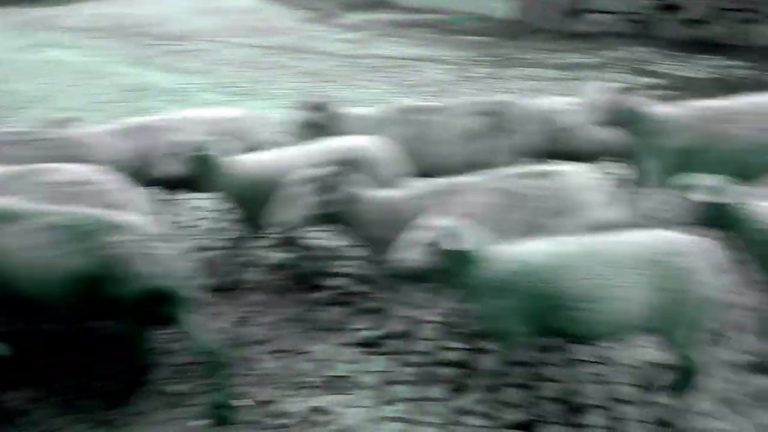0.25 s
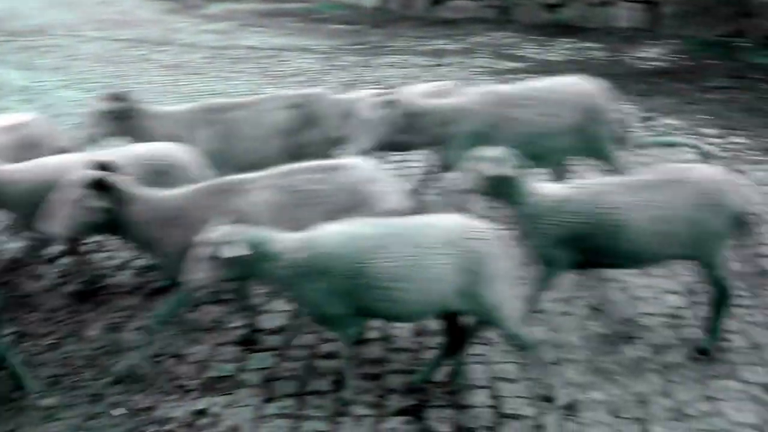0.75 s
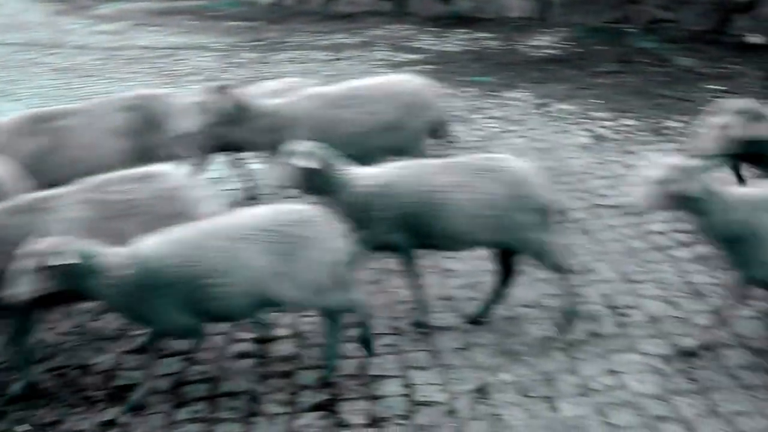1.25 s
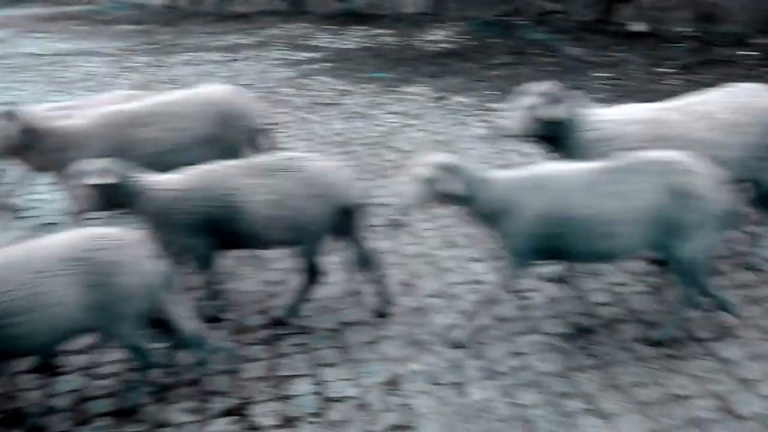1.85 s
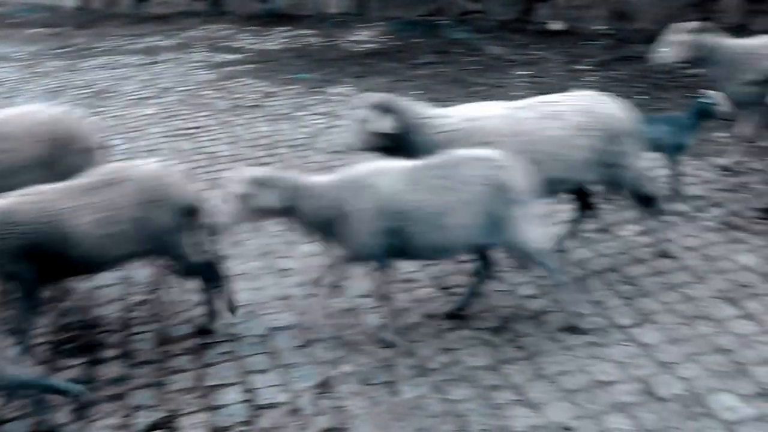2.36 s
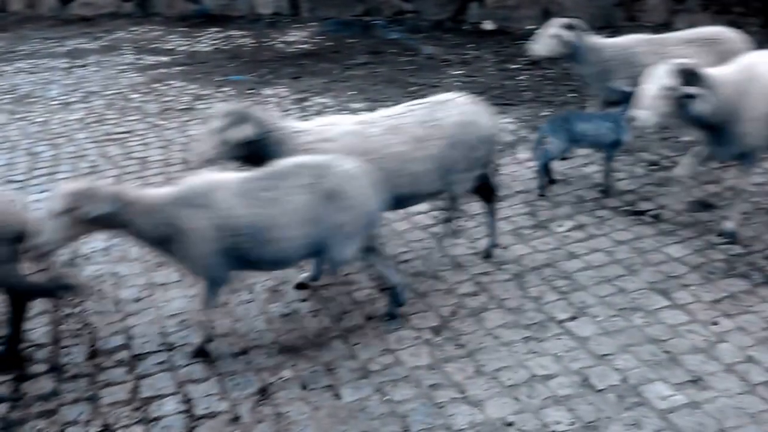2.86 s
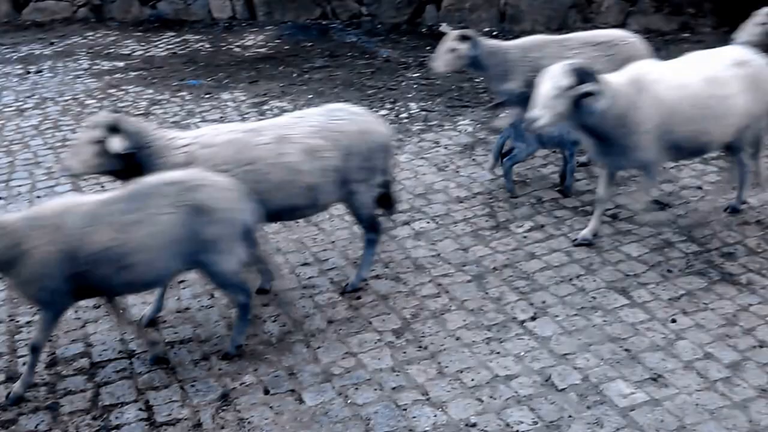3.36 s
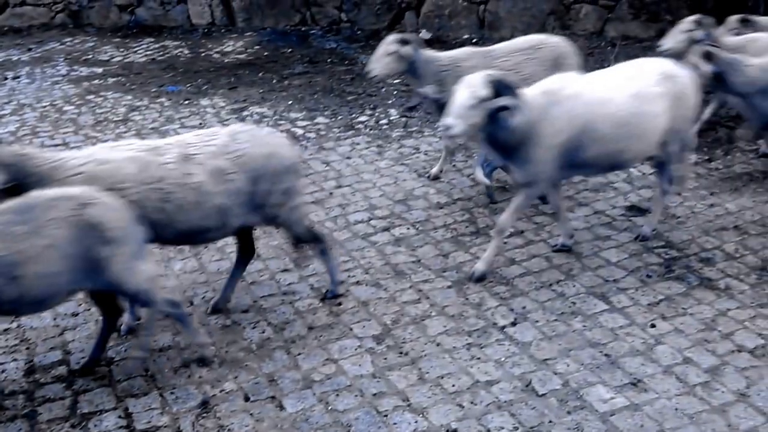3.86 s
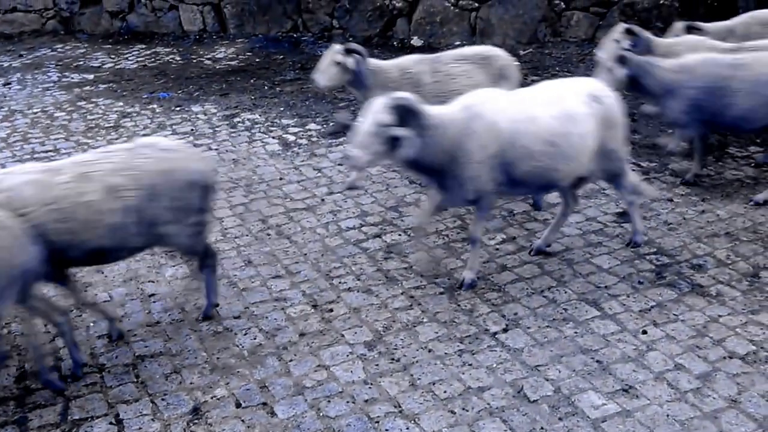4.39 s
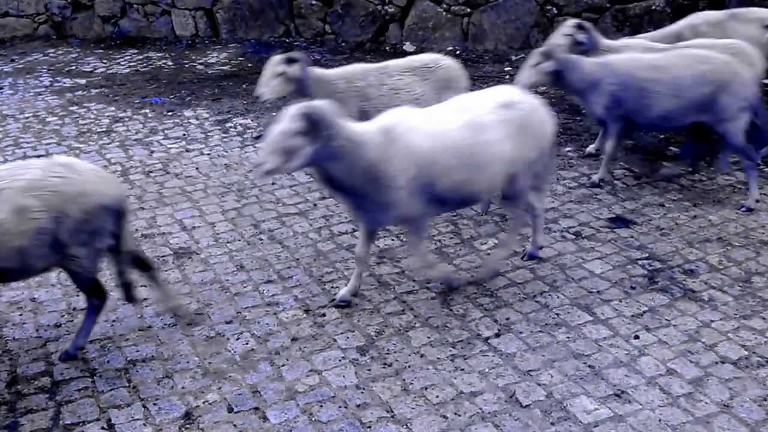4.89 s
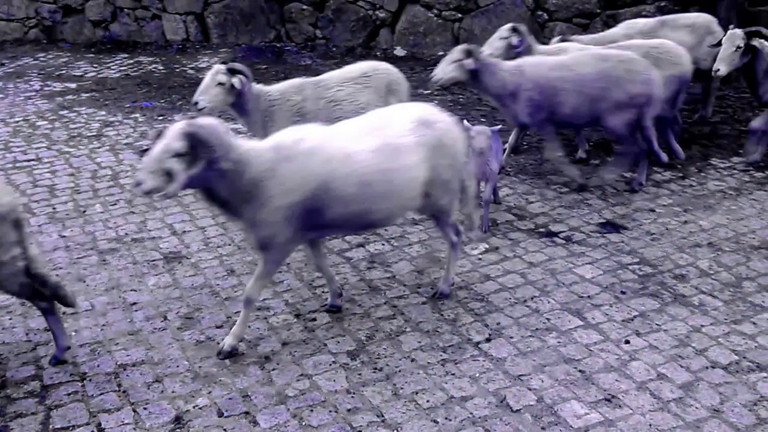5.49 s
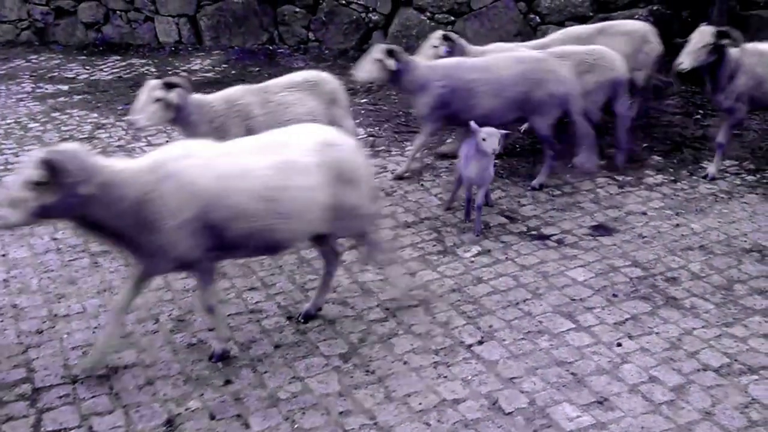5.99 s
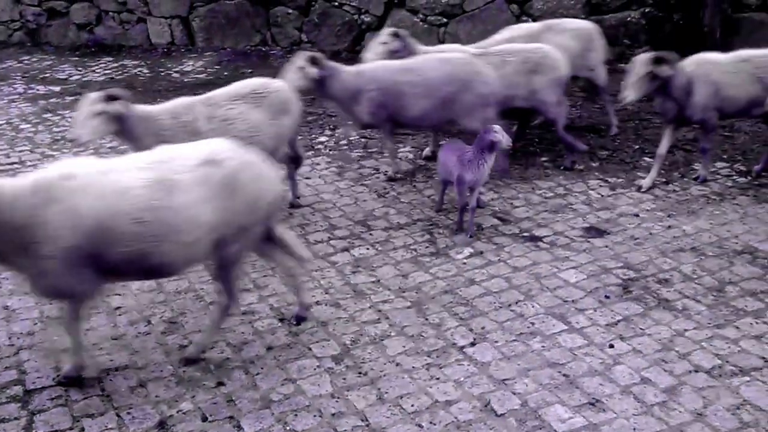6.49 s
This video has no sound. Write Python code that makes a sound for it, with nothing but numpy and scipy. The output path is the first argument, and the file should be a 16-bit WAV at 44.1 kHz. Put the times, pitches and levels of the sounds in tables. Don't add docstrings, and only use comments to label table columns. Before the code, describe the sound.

Hooves drag and click on cobbles with gritty hiss while sheep pass outdoors. First a hoarse, pulsing low grumble, then a mid-distance quavering bleat of about a second. After a stretch of only footfalls, a full-throated, nasal bleat bursts out at arm's length, held and clipped by the microphone. It stops abruptly, leaving a cluster of bright hoof clacks and light wind.

```python
import sys
import numpy as np
from scipy import signal
from scipy.io import wavfile
from scipy.ndimage import uniform_filter1d

SR = 44100
rng = np.random.default_rng(int(sys.argv[2]) if len(sys.argv) > 2 else 0)


def amplitude_ratio(level_db):
    exponent = np.asarray(level_db, float) / 20
    return 10 ** exponent


def to_wav(s):
    ch = np.atleast_2d(s).T
    pcm = np.round(np.clip(ch, -1, 1) * 32767)
    wavfile.write(sys.argv[1], SR, pcm.astype(np.int16))


N = 297234

# start_s, effort_db, pitch_hz, mouth_opening_factor
NEAR_BLEAT = [
    (4.625, -35, 148.4, 0.87),
    (4.668, -9.5, 144.2, 0.88),
    (4.714, -17, 160, 0.97),
    (4.78, -5, 169.7, 1.02),
    (4.92, -2.5, 188.1, 1.07),
    (5.201, -5, 191.2, 1.008),
    (5.638, -6.5, 187, 1.0),
    (5.834, -11.5, 177.6, 1.027),
    (5.895, -33, 137.4, 0.54),
]
# start_s, roughness_0_to_1
NEAR_ROUGH = [(4.61, .25), (4.7, .15), (4.75, .07), (4.95, .08), (5.12, .04), (5.3, .02), (5.82, .03),
              (5.91, .15)]
# start_s, factor
NEAR_JAW = [(4.61, 1.45), (4.79, 1.3), (4.84, 0.9), (5.909, 1.21)]
# centre_hz, width_hz, level_db
NEAR_THROAT = [(502.5, 235, -5), (926, 190, -8.5), (1422, 353, -4.5), (1990, 475, -2.5), (2320, 420, 3.5),
               (2720, 410, 1.5), (3120, 300, -3), (3900, 317, 10), (4570, 720, 5), (5480, 390, 3),
               (7100, 2960, -3)]
# centre_s, level_db, half_length_s
NEAR_CATCHES = [
    (4.981, -2, 0.05),
    (5.189, -1, 0.02),
    (5.301, -2, 0.059),
    (5.548, -4, 0.015),
    (5.715, 0.5, .04),
]
# share, delay_ms at start, middle, end
NEAR_ECHOES = [(0.64, 2.69, 3.92, 5.2), (0.31, 7.5, 6.1, 5.6), (0.39, 1.113, 1.922, 1.314),
               (0.6, 11.5, 13.6, 15.2), (0.2, 5.6, 4.1, 5.3)]
NEAR_QUIVER = dict(crest_s=5.04, per_s=7.8, strongest_s=5.0, spread_s=.2, pitch=0.018, effort_db=1, low_db=2)
NEAR_TONE = dict(low_db=-23, rise_s=0.21, fall_s=0.07, sag_db_per_s=-1,
                 bright_db=-10, bright_per_db=0.08, dull_db_per_s=-8)


def near_bleat():
    voice = bleat(NEAR_BLEAT, NEAR_QUIVER, NEAR_TONE, NEAR_ROUGH, NEAR_JAW, NEAR_THROAT, NEAR_CATCHES, jitter=.05)
    return bounce(voice, NEAR_BLEAT, NEAR_ECHOES)


# start_s, effort_db, pitch_hz, mouth_opening_factor
FAR_BLEAT = [
    (.82, -36, 139.5, 1.8),
    (.86, -26, 151.2, 0.96),
    (.93, -10.5, 173.9, 1.053),
    (1.06, -8, 189.2, 0.987),
    (1.25, -11.5, 189.6, 0.94),
    (1.53, -12, 186.8, 0.97),
    (1.66, -16.5, 178.8, 1.036),
    (1.859, -20, 165.4, 1.064),
    (1.931, -54, 157, 0.68),
]
# start_s, roughness_0_to_1
FAR_ROUGH = [(.82, .05), (1.1, .03), (1.2, .11), (1.55, .21), (1.95, .35)]
# start_s, factor
FAR_JAW = [(0.821, 1.08), (1.0, 1.03), (1.699, 1.03), (1.78, 1.044), (1.86, 1.11), (1.931, 0.82)]
# centre_hz, width_hz, level_db
FAR_THROAT = [(585, 163, 2), (980, 1100, -9.5), (1700, 520, -3), (2323, 650, 2.5), (2900, 680, 3.5),
              (3840, 1350, -14), (6100, 930, -13.5)]
# centre_s, level_db, half_length_s
FAR_CATCHES = [
    (1.163, -1.5, 0.056),
    (1.462, -1, 0.0067),
    (1.59, -4, 0.031),
    (1.756, -1.5, 0.012),
]
# share, delay_ms at start, middle, end
FAR_ECHOES = [(0.38, 2.225, 3.063, 3.63), (0.28, 8.5, 7.2, 6.6)]
FAR_QUIVER = dict(crest_s=1.372, per_s=7.05, strongest_s=1.453, spread_s=0.454,
                  pitch=0.0191, effort_db=1, low_db=4.5)
FAR_TONE = dict(low_db=-21, rise_s=0.25, fall_s=0.1, sag_db_per_s=-4.5,
                bright_db=-12.5, bright_per_db=0.4, dull_db_per_s=0.5)


def far_bleat():
    voice = bleat(FAR_BLEAT, FAR_QUIVER, FAR_TONE, FAR_ROUGH, FAR_JAW, FAR_THROAT, FAR_CATCHES, jitter=.08)
    return bounce(voice, FAR_BLEAT, FAR_ECHOES)


def bleat(rows, tremble, colour, roughness, jaw, throat, catches, jitter):
    span = slice(int(rows[0][0] * SR), int(rows[-1][0] * SR))
    curves = columns(rows) + columns(roughness) + columns(jaw)
    effort_db, hz, mouth, rough, drop = (uniform_filter1d(c, size=900)[span] for c in curves)
    t = np.arange(N)[span] / SR
    low_db, bright_db = tone(t, effort_db, **colour)
    lift, push_db, swell_db = quiver(t, **tremble)
    for s, db, half in catches:
        push_db = push_db + db * np.exp(-((t - s) / half) ** 2)
    wander = .004 * drift(len(t), 0.0506)
    clicks, puffs = folds(hz * (lift + wander), rough, 8300, jitter)
    drive = clicks + puffs
    jaw_open = amplitude_ratio(low_db - low_db.max())

    middle, high = 0, 0
    for k, (f, width, db) in enumerate(throat[1:]):
        gain = (-1) ** k * amplitude_ratio(db)
        if f < 3400:
            middle = middle + gain * resonate(drive, f * mouth, width) * (jaw_open if f < 1600 else 1)
        else:
            high = high + gain * resonate(drive, f * (mouth if f > 5000 else 1), width)
    middle = highpass(middle, 2, 1250)
    low_drive = clicks + .3 * puffs
    low = amplitude_ratio(low_db + swell_db) * evened(resonate(low_drive, throat[0][0] * drop, throat[0][1]))
    voice = amplitude_ratio(effort_db + push_db) * (evened(middle) + amplitude_ratio(bright_db) * evened(high)) - low
    out = np.zeros(N)
    out[span] = voice * signal.windows.tukey(len(hz), .04)
    return highpass(out, 4, 340)


def folds(hz, rough, top_hz, jitter, smear=.06):
    turns = np.cumsum(hz * (1 + jitter * rough * drift(len(hz), 0.0037))) / SR
    harmonics = range(1, int(top_hz / hz.max()))
    clicks = sum(np.cos(2 * np.pi * k * turns - smear * k ** 2) for k in harmonics)
    puffs = (0.34 + np.exp(-(turns % 1) / 0.19)) * rng.standard_normal(len(hz))
    return np.sqrt(1 - rough) * evened(clicks), rough * 2.0 * evened(puffs)


def quiver(t, crest_s, per_s, strongest_s, spread_s, pitch, effort_db, low_db):
    wave = np.cos(2 * np.pi * per_s * (t - crest_s)) * np.exp(-((t - strongest_s) / spread_s) ** 4)
    return 1 + pitch * wave, effort_db * wave, low_db * wave


def tone(t, effort_db, low_db, rise_s, fall_s, sag_db_per_s, bright_db, bright_per_db, dull_db_per_s):
    shut = np.maximum(1 - (t - t[0]) / rise_s, 0) ** 2 + np.maximum(1 - (t[-1] - t) / fall_s, 0) ** 2
    slack_db = np.clip(effort_db - effort_db.max(), -14, 0)
    middle_s = t - t.mean()
    low = low_db + sag_db_per_s * middle_s - 25 * shut
    return low, bright_db + bright_per_db * (slack_db + 1.0) + dull_db_per_s * middle_s


def bounce(x, rows, echoes):
    woolly = signal.butter(2, (1500, 4600), "band", fs=SR, output="sos")
    thin = signal.sosfiltfilt(woolly, x)
    times, at = np.linspace(rows[0][0], rows[-1][0], 3), np.arange(N)
    wet = 0
    for share, *delay_ms in echoes:
        delay = np.interp(at / SR, times, delay_ms) * SR / 1000
        wet = wet + share * np.interp(at - delay, at, thin)
    return x - thin + (thin + wet) / np.sqrt(1 + sum(row[0] ** 2 for row in echoes))


# start_s, level_db, pitch_hz
RUMBLE = [
    (0.0, -34.5, 72.1),
    (.11, -33.5, 71.05),
    (.2, -34, 70.4),
    (.39, -35, 67.7),
    (.43, -39.5, 59.7),
    (.5, -39.5, 59),
    (.55, -55, 59.6),
    (.66, -65, 61),
]
# centre_hz, width_hz, level_db
CHEST = [(69.5, 81, -3.5), (114, 30, -15), (212, 72, -4.5), (321, 62, 7)]
# centre_hz, width_hz, level_db
NOSE = [(628, 207, -2), (717, 24, 7.5), (1078, 167, -0.5)]


def rumble():
    level_db, hz = (c[:int(RUMBLE[-1][0] * SR)] for c in columns(RUMBLE))
    drive = sum(folds(hz, np.full(len(hz), .26), 1800, jitter=.2, smear=.01))
    drive = drive * amplitude_ratio(2.5 * drift(len(hz), .012))
    chest = evened(sum(amplitude_ratio(db) * resonate(drive, f, width) for f, width, db in CHEST))
    nose = evened(sum(amplitude_ratio(db) * resonate(drive, f, width) for f, width, db in NOSE))
    nose_db = -8.5 + 1.54 * (level_db - level_db.mean())
    fade = np.minimum(np.arange(len(hz))[::-1] / 2000, 1)
    return np.pad(amplitude_ratio(level_db) * (chest - amplitude_ratio(nose_db) * nose) * fade, (0, N - len(hz)))


STRIKE_S = np.arange(4500) / SR

# start_s, peak_db, centre_hz, t60_s
STRIKES = [(0.3107, -17.5, 2900, 0.45), (0.511, -21.5, 2490, 0.35), (1.046, -12, 3390, 0.084),
           (1.6586, 0.5, 2860, 0.13), (1.7866, -3, 2520, 0.13), (2.0338, -10, 3620, 0.12),
           (2.149, -6, 2640, 0.052), (2.2943, -3, 4040, 0.053), (2.4044, -20, 3700, 0.24),
           (2.529, -17, 3460, 0.34), (2.7768, -10.5, 3390, 0.39), (2.905, -14.5, 3620, 0.28),
           (3, -9.5, 3120, 0.081), (3.1234, -21, 3150, 0.33), (3.251, -15, 4250, 0.081),
           (3.506, -16.5, 4040, 0.13), (3.641, -12, 3930, 0.21), (3.8191, -8, 3840, 0.1),
           (3.9854, -5.5, 3520, 0.068), (4.066, -12, 2500, 0.17), (4.103, -8.5, 3470, 0.09),
           (4.249, -33, 4080, 0.13), (4.398, -11.5, 3750, 0.29), (5.934, 1, 2100, 0.058),
           (6.065, -9, 3560, 0.14), (6.106, -1.5, 3780, 0.065), (6.281, -7, 2720, 0.15),
           (6.4981, -6, 3500, 0.067), (6.661, -15.5, 6600, 0.2), (0.688, -3.5, 2910, 0.046)]


def scuff(peak_db, hz, t60):
    noise = rng.standard_normal(len(STRIKE_S))
    fall = amplitude_ratio(-60 * STRIKE_S / np.clip(t60, .02, .4)) * np.minimum(STRIKE_S / 0.016, 1)
    skid = evened(resonate(noise, hz, 2000)) + amplitude_ratio(-7.5) * evened(resonate(noise, 5600, 4400))
    return amplitude_ratio(peak_db - 9.5) * fall * highpass(skid, 6, 2300)


# start_s, peak_db, ring_hz
CLACKS = [(.3287, -12, 2810), (.141, -17, 2900), (.202, -18, 2900), (.6429, -13, 2890), (.84, -14, 2740),
          (1.9994, -11, 3350), (2.1744, -10, 3570), (2.2922, -9, 2970), (2.4054, -13, 3500),
          (2.6314, -9, 3100), (2.6464, -11, 3000), (2.779, -11, 3000), (2.8114, -10, 3180),
          (2.834, -9, 2950), (2.9234, -13, 2950), (3.4166, -17, 3430), (3.4451, -18, 3550),
          (3.8274, -20, 3470), (4.408, -14, 3800), (4.4204, -18, 3680), (4.5575, -19, 2790),
          (5.9379, -12, 2620), (5.9579, -11, 2730), (5.9813, -11.5, 2690), (6.0152, -11, 2750),
          (6.0272, -12, 2730), (6.1729, -6.5, 2860), (6.2267, -18, 2900), (6.2442, -18, 3030),
          (6.2786, -4, 2760), (6.3475, -16, 2820), (6.4737, -13, 2710), (6.6987, -9, 2780),
          (6.7124, -8, 2740)]


def clack(peak_db, hz):
    tick = .8 * np.sin(2 * np.pi * 5800 * STRIKE_S) * amplitude_ratio(-60 * STRIKE_S / .002)
    ring = .75 * np.sin(2 * np.pi * hz * STRIKE_S) * amplitude_ratio(-60 * STRIKE_S / .022)
    return amplitude_ratio(peak_db - 1.5) * thinned(tick + ring * np.minimum(STRIKE_S / .0006, 1))


# start_s, peak_db, centre_hz
SNAPS = [(.372, -26, 6000), (1.125, -14, 6500), (1.413, -13.5, 3197), (1.676, -9, 2950),
         (1.9678, -14, 2760), (2.1744, -13, 7000), (2.2246, -29, 3110), (2.2924, -11.5, 6900),
         (2.301, -12, 6800), (2.4057, -7.5, 7530), (2.723, -25, 7260), (2.7788, -11, 7640),
         (2.8114, -11, 4200), (3.125, -21, 6570), (3.2543, -23.5, 7570), (3.391, -32, 3770),
         (3.507, -19, 7800), (3.9846, -15, 3710), (4.2475, -22, 7020), (4.4083, -17, 3900),
         (4.5573, -14, 7700), (3.829, -17, 3550), (3.152, -15.5, 3300), (2.904, -10.5, 3380),
         (0.6436, -32, 3030), (1.999, -15, 3420), (5.9822, -15, 2600), (5.9574, -11, 6500),
         (6.1084, -15, 4170), (6.1727, -22, 6440), (6.208, -13, 6000), (6.264, -16, 6950),
         (6.279, -9, 4440), (6.375, -17, 7540), (6.4767, -13, 6600), (6.667, -17, 6850),
         (6.699, -5.5, 6920)]


def snap(peak_db, hz):
    brief = STRIKE_S[:1200]
    crack = evened(resonate(rng.standard_normal(len(brief)), hz, 940)) * amplitude_ratio(-60 * brief / 0.017)
    return amplitude_ratio(peak_db - 5.0) * thinned(crack)


# start_s, peak_db, pitch_hz
KNOCKS = [(.84, -41, 2090), (1.9669, -43, 1854), (2.7265, -34, 1790), (2.9214, -24, 1710),
          (2.9712, -26, 1900), (4.084, -19.5, 1490), (4.415, -16.5, 1920), (4.4203, -21, 1530),
          (4.427, -15, 2150), (4.432, -17, 1610), (4.5262, -23, 1680), (4.5594, -29, 1990),
          (5.937, -15, 2050), (5.9577, -14, 1880), (5.9844, -11.5, 2070), (6.0164, -16, 1890),
          (6.0252, -11.5, 1970), (6.1738, -14.5, 1830), (6.2784, -18, 1630), (6.35, -22, 1910),
          (6.4284, -25.5, 1650), (6.4766, -18.5, 1700)]


def knock(peak_db, hz):
    hollow = np.sin(2 * np.pi * hz * STRIKE_S) * amplitude_ratio(-60 * STRIKE_S / 0.018)
    return amplitude_ratio(peak_db) * thinned(hollow * np.minimum(STRIKE_S / 0.00051, 1))


# start_s, peak_db, pitch_hz
THUDS = [(0.454, -31, 109), (0.674, -49, 123), (0.771, -45, 111), (1.691, -44.5, 157), (2.492, -52, 161),
         (2.779, -51, 126), (3.026, -56, 108), (3.513, -50.5, 137), (3.978, -45, 117), (4.068, -45.5, 155),
         (4.407, -51, 129), (4.493, -48, 127), (4.625, -37, 146), (5.897, -45.5, 107.4), (6.19, -58, 118)]


def thud(peak_db, hz):
    push = np.sin(2 * np.pi * hz * STRIKE_S) * np.minimum(STRIKE_S / 0.0053, 1)
    return amplitude_ratio(peak_db - 60 * STRIKE_S / 0.29) * push


# centre_s, peak_db, centre_hz,
# half_length_s
BRUSHES = [(0.699, -48, 1300, 0.026), (0.863, -47, 380, 0.037), (2.308, -56, 378, 0.03),
           (2.729, -50, 1190, 0.005), (2.786, -55, 700, .008), (3.252, -53, 910, 0.0076),
           (3.945, -51, 675, 0.015), (4.085, -37, 980, 0.0083), (4.125, -44, 1130, 0.023),
           (5.503, -38, 406, 0.018), (5.944, -46, 500, 0.045), (6.195, -41.5, 570, 0.0055)]


def brush(peak_db, hz, half):
    swell = np.exp(-((STRIKE_S - .05) / half) ** 2)
    return amplitude_ratio(peak_db) * swell * evened(resonate(rng.standard_normal(len(STRIKE_S)), hz, 900))


def strikes():
    out = np.zeros(N + len(STRIKE_S))
    contacts = [(STRIKES, scuff, 0), (CLACKS, clack, 0), (SNAPS, snap, 0),
                (KNOCKS, knock, 0), (THUDS, thud, 0), (BRUSHES, brush, .05)]
    for rows, contact, lead_s in contacts:
        for s, *settings in rows:
            sound = contact(*settings)
            out[int((s - lead_s) * SR):][:len(sound)] += sound
    return out[:N]


# start_s, level_db
SHUFFLE = [(0, -44.5), (.45, -41), (.8, -42.5), (1.0, -37), (1.9, -36), (2.6, -41), (3.15, -41.5),
           (3.36, -51.5), (3.6, -45.5), (4.1, -39), (4.36, -48), (4.65, -38), (5.85, -34.5), (5.91, -43.5),
           (6.1, -40.5), (6.45, -45.5), (6.6, -51), (6.74, -39)]
# centre_s, peak_db, half_length_s
SWISHES = [(0.334, -22, 0.014), (0.843, -21.5, 0.0037), (1.058, -15, 0.0066), (1.132, -26, 0.021),
           (1.482, -35, 0.011), (1.67, -23, 0.0041), (1.75, -32, 0.011), (1.842, -25, 0.025),
           (2.169, -20.5, 0.0062), (2.298, -20, 0.005), (2.408, -26, 0.016), (2.726, -20, 0.0031),
           (2.782, -20.5, 0.014), (2.929, -25, 0.022), (3.023, -25.5, 0.011), (3.148, -32, 0.081),
           (3.512, -31, 0.015), (3.663, -24, 0.03), (3.835, -23.5, 0.02), (3.897, -27.5, 0.06),
           (4.07, -26, 0.0074), (4.283, -27, 0.014), (4.415, -26.5, 0.014), (4.56, -32, 0.0018),
           (5.958, -27, 0.0034), (6.228, -33, 0.0081), (6.281, -27, 0.043), (6.377, -29, 0.008),
           (6.506, -23.5, 0.0081), (6.701, -20, 0.0042)]
# frequency_hz, level_db_per_hz
SCUFF = [(88, -71), (150, -23.5), (445, -33), (1260, -18.5), (1510, -16), (1940, -9), (2400, -8.5),
         (2750, 0.5), (4120, -2), (5040, -10), (7040, -2), (8180, -6), (10600, -105), (18000, -120)]


def shuffle():
    steady = amplitude_ratio(columns(SHUFFLE)[0]) ** 2
    swept = amplitude_ratio(-6) ** 2 * swells(SWISHES, fall_db=-1.5, rise=1.17)
    level_db = 10 * np.log10(steady + swept)
    dull_db = 10 * np.log10(amplitude_ratio(6) ** 2 * steady + 0.13 * swept) - level_db
    drag = hiss(SCUFF, dull_db - 3.5, 2.66, size=256)
    grit = amplitude_ratio(6.3 * np.minimum(rng.exponential(1, N), 3)) * (rng.random(N) < 120 / SR)
    grains = highpass(drag * np.convolve(grit, np.exp(-np.arange(200) / 40))[:N], 4, 2400)
    distant = amplitude_ratio(-44.5) * hiss(SCUFF, None, 0.99, size=1024)
    return amplitude_ratio(level_db + 6) * (drag * amplitude_ratio(1.6 * drift(N, 0.0094)) + 0.21 * grains) + distant


def lane(x, t60):
    at = np.arange(120, SR // 2, 22)
    at = at + rng.integers(0, 22, len(at))
    taps = np.zeros(SR // 2 + 22)
    taps[at] = rng.choice([-1., 1.], len(at)) * amplitude_ratio(-60 * at / SR / t60)
    taps = signal.sosfilt(signal.butter(2, 4500, fs=SR, output="sos"), taps / np.linalg.norm(taps))
    return signal.fftconvolve(x, taps)[:N]


# centre_s, peak_db, half_length_s
GUSTS = [
    (.35, -44.5, 0.34),
    (1.15, -59, 0.19),
    (1.9, -49, 0.16),
    (3.15, -52.5, 0.051),
    (3.6, -54, 0.11),
    (4.15, -51, 0.054),
    (4.9, -57.5, 0.29),
    (6.26, -38, 0.055),
    (6.5, -49, 0.26),
]
# frequency_hz, level_db_per_hz
WIND = [(15, 4.5), (38, -5), (80, -6.5), (200, -18), (500, -20.5), (1200, -30)]


def wind():
    level = np.sqrt(amplitude_ratio(-55) ** 2 + swells(GUSTS, fall_db=-6, rise=1.3))
    return level * amplitude_ratio(2.0 * drift(N, 0.037)) * hiss(WIND, None, 3, size=2048)


def hiss(spectrum, tilt_db, patchy_db, size):
    hop = size // 4
    frames, hz = N // hop + 5, np.fft.rfftfreq(size, 1 / SR)
    a, b, patches = rng.standard_normal((frames, len(hz), 3)).T
    patches = evened(uniform_filter1d(uniform_filter1d(patches, size=5, axis=0), size=20, axis=1))
    f, level = np.transpose(spectrum)
    colour_db = np.interp(np.log(hz + 1), np.log(f), level)[:, None]
    z = (a + 1j * b) * amplitude_ratio(colour_db + patchy_db * patches)
    flat = signal.istft(z, nperseg=size, noverlap=size - hop)[1][:N]
    if tilt_db is None:
        return evened(flat)
    tilt = tilt_db[np.minimum(np.arange(frames) * hop, N - 1)] / (1 + (hz[:, None] / 5000) ** 6)
    return signal.istft(z * amplitude_ratio(tilt), nperseg=size, noverlap=size - hop)[1][:N] / np.std(flat)


def swells(rows, fall_db, rise):
    t = np.arange(0, N, 32) / SR
    power = 0
    for s, db, half in rows:
        away = abs((t - s) / half * np.where(t < s, rise, 1))
        power = power + amplitude_ratio(db + fall_db * away ** 1.68) ** 2
    return np.interp(np.arange(N) / SR, t, power)


def resonate(x, hz, width):
    turn = np.exp(2j * np.pi * np.cumsum(hz * np.ones(len(x))) / SR)
    r = np.exp(-np.pi * width / SR)
    return 2 * (turn * signal.lfilter([(1 - r) ** 2], [1, -2 * r, r * r], x / turn + 1e-18)).real


def drift(count, span_s):
    size = max(int(span_s * SR), 2)
    return evened(uniform_filter1d(uniform_filter1d(rng.standard_normal(count), size), size))


def evened(x):
    return x / np.sqrt(np.mean(x ** 2) + 1e-20)


def columns(rows):
    s, *values = np.transpose(rows)
    return [np.interp(np.arange(N) / SR, s, v) for v in values]


def highpass(x, order, hz):
    return signal.sosfilt(signal.butter(order, hz, "high", fs=SR, output="sos"), x)


def thinned(x):
    return highpass(x, 4, 1300)


def treble(x):
    return highpass(x, 2, 1100)


def scene():
    near, far = near_bleat(), far_bleat()
    low, hooves = rumble(), strikes()
    close = lane(amplitude_ratio(-9) * treble(near), t60=.05)
    walls = lane(amplitude_ratio(-3.5) * treble(far) + amplitude_ratio(-12) * treble(near) + amplitude_ratio(-5) * low + amplitude_ratio(-6) * hooves, t60=.2)
    return (amplitude_ratio(-3.5) * (near + close) + amplitude_ratio(-12.5) * far + low + hooves + walls + shuffle() + wind())[None]


def low_pass(x):
    return signal.sosfilt(signal.butter(12, 16000, fs=SR, output="sos"), x)


# centre_s, level_db, half_length_s
HUSHES = [
    (3.795, -22, 0.017),
    (3.892, -14, 0.0092),
]


def record(dry):
    bend = highpass(np.maximum(abs(dry) - 0.6, 0), 2, 90)
    hot = np.clip(dry - 0.37 * bend, -.93, .87)
    lower = signal.sosfiltfilt(signal.butter(6, 1900, fs=SR, output="sos"), hot)
    t = np.arange(N) / SR
    hush_db = sum(db * np.exp(-((t - s) / half) ** 4) for s, db, half in HUSHES)
    hot = hot + lower * (amplitude_ratio(hush_db) - 1)
    edge = signal.firwin(801, 8370, window=("kaiser", 9), fs=SR)
    cut = np.clip(signal.oaconvolve(hot, edge[None], "same"), -.975, .975)
    top = signal.firwin(301, 16000, window=("kaiser", 8), fs=SR)
    return low_pass(signal.oaconvolve(cut, top[None], "same"))


dry = scene()
out = record(dry)
to_wav(out)
```